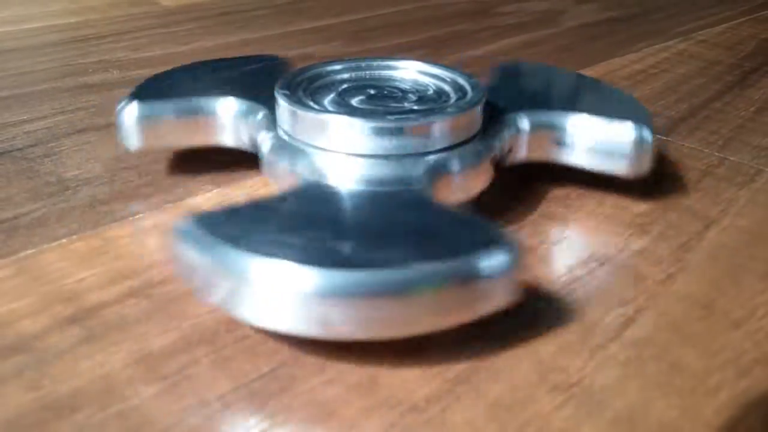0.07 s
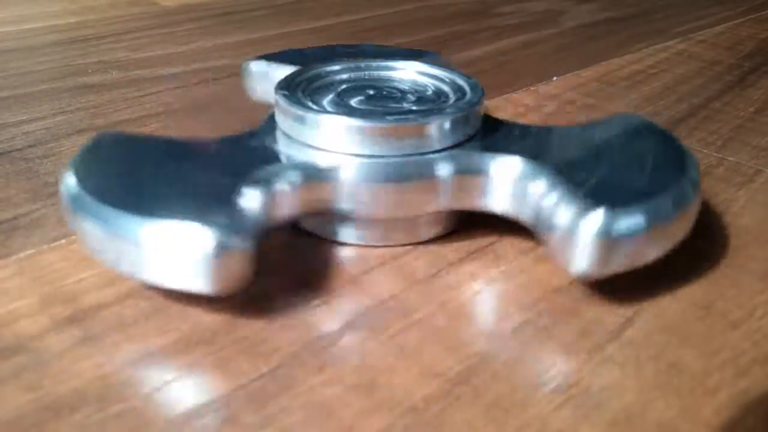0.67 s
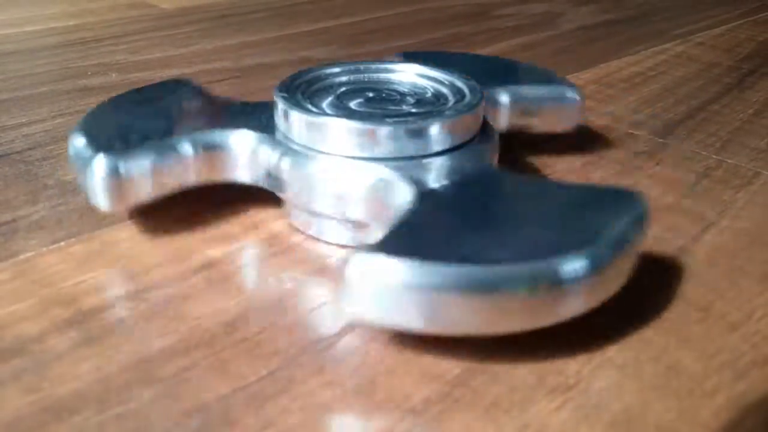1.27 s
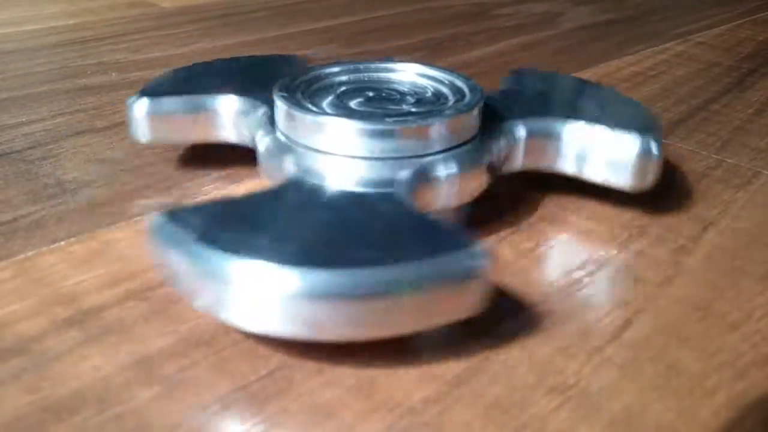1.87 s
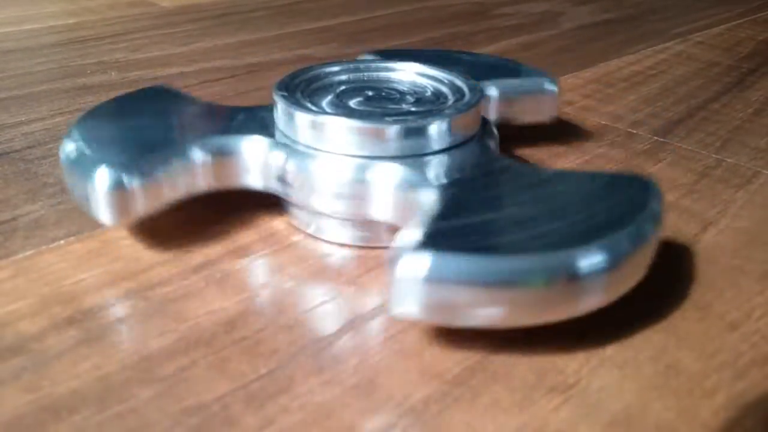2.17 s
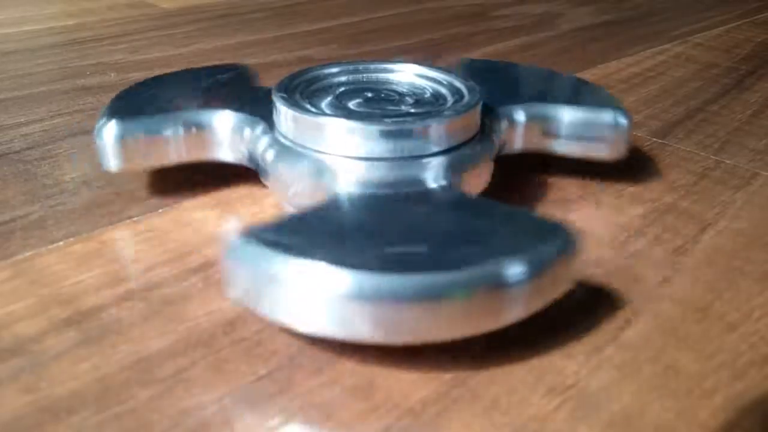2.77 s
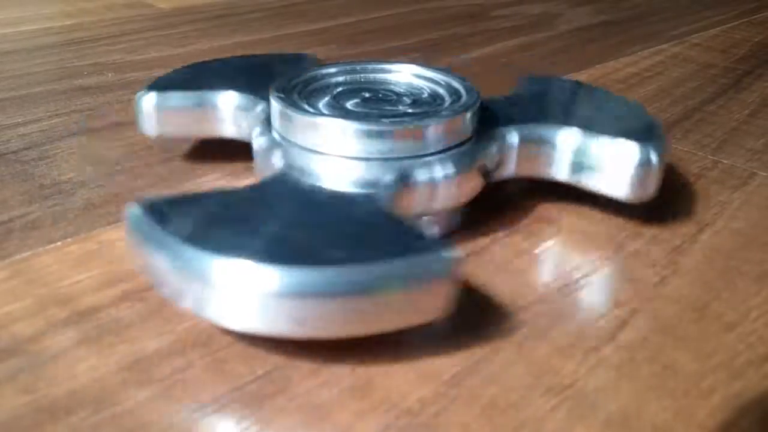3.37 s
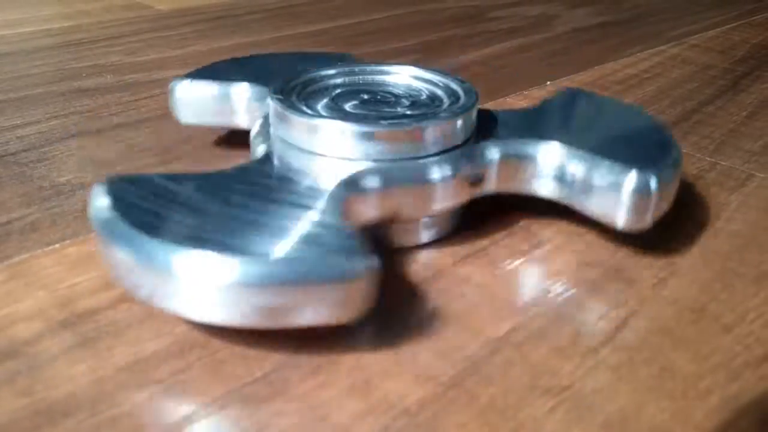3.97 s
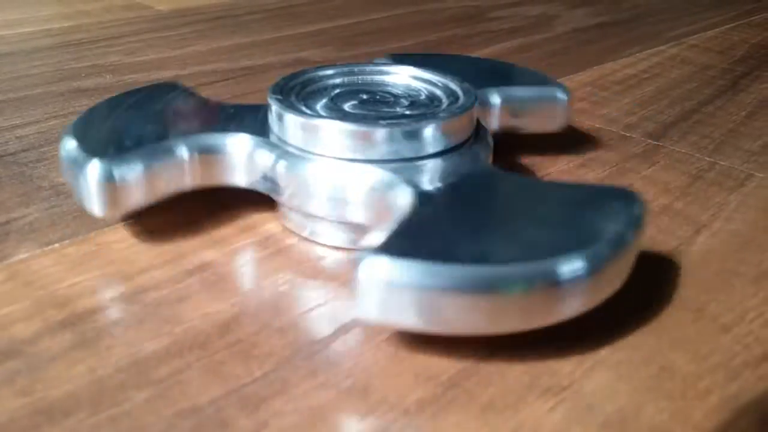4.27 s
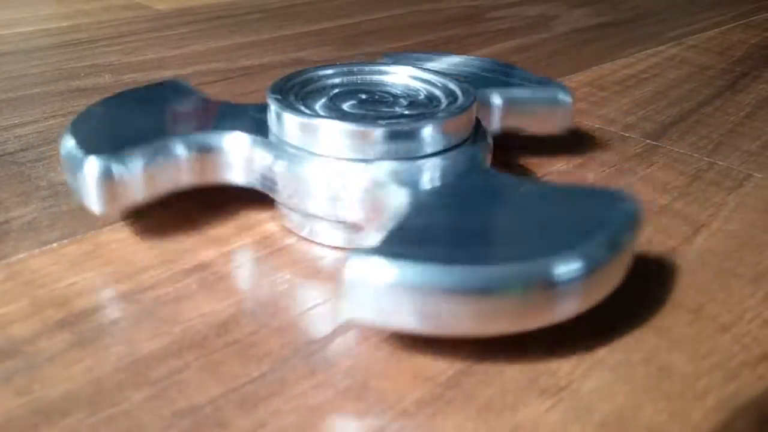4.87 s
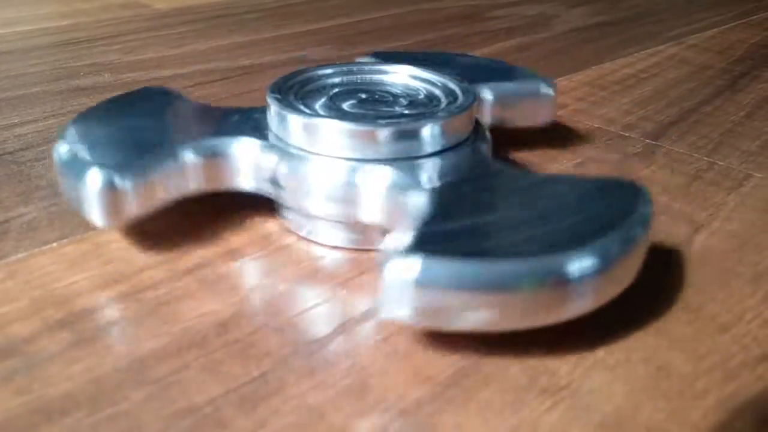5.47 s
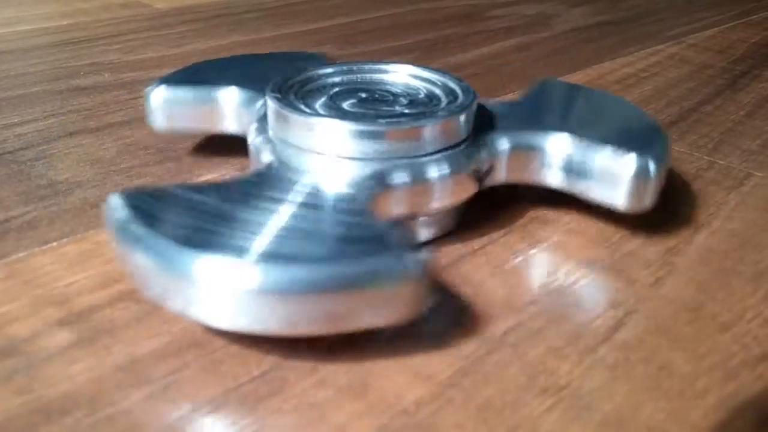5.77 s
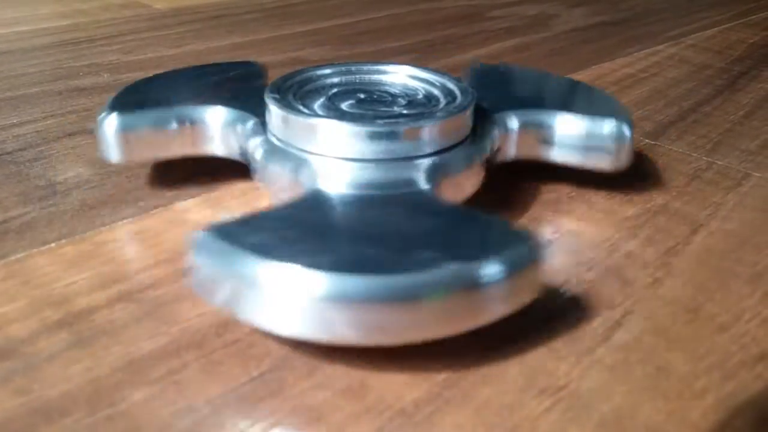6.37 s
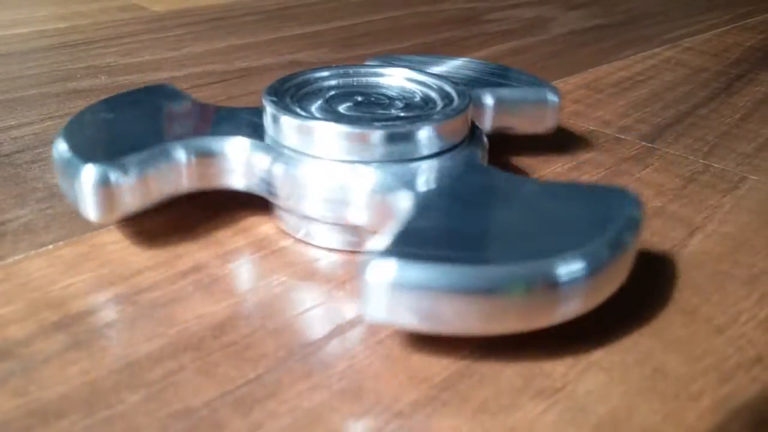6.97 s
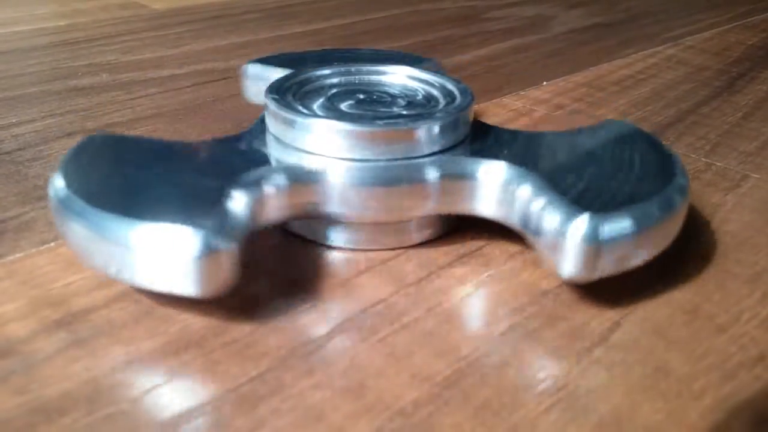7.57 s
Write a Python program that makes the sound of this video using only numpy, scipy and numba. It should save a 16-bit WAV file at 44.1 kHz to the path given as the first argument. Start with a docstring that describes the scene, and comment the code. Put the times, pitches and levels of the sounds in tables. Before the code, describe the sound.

In a quiet room, a low engine drone comes through the walls, swells after about a second, then sinks to a faint idle. An appliance hums under fluttering hiss, and a clock clacks softly about once a second. Light scuffs and a brief rustle come and go. Close to the microphone, a metal spinner on a wooden table gives a few tiny ringing ticks, and a dull bump sounds on the table near the end.

```python
"""An engine drones through the walls of a quiet room, swells, then idles; a faint hum swells with it.
An appliance motor hums over room air and microphone hiss; a faint rustle dies away.
Scuffs and brief low swells of noise come and go; a clock clacks in its case about once a second.
A metal spinner on a wooden table gives a few tiny ringing ticks; one bump rings the table top.
The phone's noise suppressor makes the hiss flutter up and down with the bass."""
import sys
import numpy as np
from scipy import signal
from scipy.fft import rfft, irfft, next_fast_len
from scipy.io import wavfile
from scipy.ndimage import uniform_filter1d
from numba import njit

SR = 44100
rng = np.random.default_rng(int(sys.argv[2]) if len(sys.argv) > 2 else 0)


def wav_record(signal):
    """Record a signal, one row per channel, as 16-bit PCM in the file named by sys.argv[1]."""
    frames = np.transpose(np.atleast_2d(signal))
    bounded = np.clip(frames, -1, 1)
    # unit amplitude maps onto the largest positive 16-bit level
    quanta = np.round(bounded * 32767).astype(np.int16)
    wavfile.write(sys.argv[1], SR, quanta)


N = 340893
TIME_S = np.arange(N) / SR


def undb(db):
    """Decibels to gain."""
    return 10 ** (np.asarray(db) / 20)


def curve(points):
    """(time_s, value) points joined by straight lines."""
    return np.interp(TIME_S, *np.transpose(points))


def walk(rate_hz):
    """Smooth random drift, spread 1, changing at about rate_hz."""
    hold = int(SR / rate_hz)
    steps = np.repeat(rng.standard_normal(N // hold + 1), hold)
    drift = uniform_filter1d(uniform_filter1d(steps, hold), hold)[:N]
    return drift / drift.std()


def noise(colour):
    """Noise shaped by (freq_hz, density_db) points."""
    freq_hz, density_db = np.transpose(colour)
    size = next_fast_len(N)
    bins_hz = np.maximum(np.fft.rfftfreq(size, 1 / SR), 1)
    gain = undb(np.interp(np.log(bins_hz), np.log(freq_hz), density_db)) * np.sqrt(SR / 2)
    return irfft(rfft(rng.standard_normal(size)) * gain, size)[:N]


def burst(start_s, rise_s, t60_s):
    """Envelope: linear rise to 1, exponential decay."""
    age_s = np.maximum(TIME_S - start_s, 0)
    decay = np.exp(-np.log(1000) * np.clip((age_s - rise_s) / t60_s, 0, 2))
    return np.minimum(age_s / rise_s, 1) * decay


def band_burst(start_s, level_db, centre_hz, width_hz, rise_s, t60_s):
    """A burst of noise in one broad resonance."""
    bins_hz = np.fft.rfftfreq(SR, 1 / SR)
    band = irfft(rfft(rng.standard_normal(SR)) / (1 + (2 * (bins_hz - centre_hz) / width_hz) ** 2))
    span = slice(int(start_s * SR), int(start_s * SR) + SR)
    envelope = burst(start_s, rise_s, t60_s)[span]
    shaped = band[:len(envelope)] * envelope
    out = np.zeros(N)
    out[span] = undb(level_db) * shaped * np.linalg.norm(envelope) / np.linalg.norm(shaped)
    return out


def strike(hits, modes, contact_s):
    """Blows ring damped modes; longer contact rounds the attack."""
    age_s = TIME_S[:SR // 4]
    ring = sum(undb(db) * np.sin(2 * np.pi * hz * age_s) * np.exp(-np.log(1000) * age_s / t60_s)
               for hz, db, t60_s in modes)
    ring *= np.minimum(age_s / contact_s, 1)
    out = np.zeros(N)
    for start_s, level_db in hits:
        place = out[int(start_s * SR):][:len(ring)]
        place += undb(level_db) * ring[:len(place)]
    return out


def drone_gain_db(dip_half_s=0.023):
    """The drone swells and sinks, with brief dips."""
    # loudness through the walls: time_s, gain_db
    loudness = [(0, -14.5), (.8, -13), (1.16, -11), (1.28, -5.5), (1.5, 1), (2.03, 3), (2.25, -3.5),
                (2.6, 0), (3.1, -3), (3.56, -4), (3.72, -13.5), (4.3, -14), (4.5, -16.5), (5.4, -13),
                (6.2, -15), (6.4, -22.5), (7.73, -19.5)]
    # level dips: time_s, depth_db
    dips = [(2.22, 3.5), (2.95, 5.5), (3.09, 3.5), (3.63, 3)]
    return curve(loudness) - sum(db * np.exp(-((TIME_S - at_s) / dip_half_s) ** 2) for at_s, db in dips)


def engine(gain_db, flutter_db=0.96, swell_db=0.5):
    """Low orders pass the walls, lifted as they slide through room modes."""
    # engine speed: time_s, cycle_hz
    speed = [(0, 42.5), (1.1, 43.3), (1.45, 45.0), (1.73, 45.0), (1.97, 41.8), (2.4, 40.7), (2.98, 40.35),
             (3.15, 39.9), (7.73, 39.8)]
    # engine orders: cycle_multiple, level_db
    orders = [(2, -51.5), (3, -52), (4, -57)]
    # room resonances: centre_hz, width_hz, lift_db
    room_modes = [(81.1, 1.8, 7), (90, 6, 13), (119.6, 2, 8.5), (124, 3, 3.5), (165, 7, 9.5), (179, 9, 5.5)]
    cycle_hz = curve(speed)
    phase = 2 * np.pi * np.cumsum(cycle_hz) / SR + 0.11 * walk(12)
    drone = 0
    for order, level_db in orders:
        lift_db = sum(db / (1 + (2 * (order * cycle_hz - centre_hz) / width_hz) ** 2)
                      for centre_hz, width_hz, db in room_modes)
        waver_db = flutter_db * walk(21.82) + swell_db * walk(4.17)
        tone = np.sin(order * phase + 2 * np.pi * rng.random())
        drone += undb(gain_db + level_db + lift_db + waver_db) * tone
    return np.sqrt(2) * drone


def faint_hum(gain_db, pitch_hz=297, flutter_db=3, wobble_rad=1.77):
    """A faint, wavering hum that swells with the drone."""
    level_db = gain_db - 64 + flutter_db * walk(20)
    return np.sqrt(2) * undb(level_db) * np.sin(2 * np.pi * pitch_hz * TIME_S + wobble_rad * walk(14))


def exhaust(gain_db, db_per_db=0.82):
    """Exhaust rumble follows the drone's level."""
    # rumble spectrum: freq_hz, density_db
    colour = [(30, -100), (60, -83.5), (90, -71), (200, -77), (330, -86), (600, -92), (1500, -102),
              (3000, -118)]
    return undb(db_per_db * gain_db - 0.5) * noise(colour)


def appliance(shaft_hz=59.25, waver_db=2.0, drift_rad=0.04):
    """A motor hums at multiples of its shaft rate."""
    # motor harmonics: shaft_multiple, level_db
    harmonics = [(1, -69.5), (2, -67.5), (3, -66.5), (4, -64), (5, -72.5), (6, -75), (7, -71), (9, -72.5),
                 (20, -79.5), (84, -94)]
    phase = 2 * np.pi * shaft_hz * TIME_S + drift_rad * walk(2)
    hum = sum(undb(db + waver_db * walk(5.5)) * np.sin(multiple * phase + 2 * np.pi * rng.random())
              for multiple, db in harmonics)
    return np.sqrt(2) * hum


def room(swell_db=1.08):
    """Dull, slightly swelling room air under steady microphone hiss."""
    # room air: freq_hz, density_db
    air_colour = [(20, -104), (42, -90.5), (65, -85), (90, -74.5), (135, -82.5), (205, -81), (310, -90),
                  (510, -89), (700, -95), (1150, -97.5), (1800, -104), (3000, -112), (6000, -125)]
    # microphone hiss: freq_hz, density_db
    hiss_colour = [(100, -109), (3000, -109), (6300, -108), (9500, -104.4), (13500, -103.9),
                   (16000, -104.4)]
    return noise(air_colour) * undb(swell_db * walk(3.2)) + noise(hiss_colour)


def rustle(gain_db=-2, uneven_db=1.6, end_s=1.66, fade_s=0.69):
    """Soft, uneven rubbing that fades out."""
    # rubbing spectrum: freq_hz, density_db
    colour = [(120, -100), (270, -80), (420, -92), (1100, -97.5), (2200, -104.5), (4500, -121)]
    fade = np.clip((end_s - TIME_S) / fade_s, 0, 1)
    return fade * undb(gain_db + uneven_db * walk(23)) * noise(colour)


def scuffs(width_ratio=0.46, t60_s=0.2):
    """Light knocks rise fast, scuffs slowly; higher ones are broader."""
    # knocks and scuffs: start_s, level_db, centre_hz, rise_s
    contacts = [(.026, -52, 477, 0.0095), (.515, -54.5, 530, 0.0026), (1.53, -67, 1400, .003),
                (2.816, -58.5, 1200, .02), (3.477, -55.5, 1050, 0.044), (3.484, -60.5, 1900, 0.023),
                (6.813, -56.5, 1040, .007)]
    return sum(band_burst(start_s, level_db, centre_hz, width_ratio * centre_hz, rise_s, t60_s)
               for start_s, level_db, centre_hz, rise_s in contacts)


def low_swells():
    """Brief low swells, all in one low band: mostly soft thuds, the last one the bump booming in the room;
    those at 3.8 and 4.322 s are only room noise."""
    # swells: start_s, level_db
    swells = [(0.031, -50), (.235, -51.5), (.40, -50), (.59, -47.5), (1.074, -50), (3.648, -45.5),
              (3.8, -46.5), (4.322, -54), (6.889, -49)]
    return sum(band_burst(start_s, level_db, centre_hz=150, width_hz=190, rise_s=0.0075, t60_s=0.11)
               for start_s, level_db in swells)


def clock(rise_s=0.0063, t60_s=0.056, room_db=-7, room_t60_s=0.47):
    """Each step of the hand clacks in the case and lingers in the room."""
    # hand steps: start_s, gain_db
    steps = [(.873, 0.5), (1.848, 2), (2.867, 4), (3.859, 2.5), (4.858, 2.5), (5.857, 1.5), (6.868, -9)]
    # case, heard across the room: freq_hz, density_db
    case_colour = [(500, -106), (900, -86.5), (1250, -89), (1500, -95.5), (2000, -96.5), (2900, -108),
                   (3450, -99), (3950, -108), (4400, -101), (4850, -105), (5250, -97.5), (6100, -112),
                   (9000, -125)]
    envelope = 0
    for start_s, gain_db in steps:
        direct = burst(start_s, rise_s, t60_s)
        tail = undb(room_db) * burst(start_s, 2 * rise_s, room_t60_s)
        envelope += undb(gain_db) * np.hypot(direct, tail)
    return envelope * noise(case_colour)


def spinner():
    """Tiny ticks ring the metal's high modes."""
    # ticks: start_s, level_db
    ticks = [(.937, -58), (4.775, -59), (6.6237, -41.5), (6.6304, -45)]
    # metal modes: pitch_hz, gain_db, t60_s
    metal_modes = [(4270, -8, 0.029), (4370, -4, 0.012), (4700, -5, 0.0077)]
    return strike(ticks, metal_modes, contact_s=0.00065)


def table_bump():
    """A dull blow rings the wooden top."""
    # bump: start_s, level_db
    bumps = [(6.8842, -34)]
    # table-top modes: pitch_hz, gain_db, t60_s
    wood_modes = [(125, -7.5, .07), (235, 4, .025), (340, -9, .024)]
    return -strike(bumps, wood_modes, contact_s=0.0026)


def scene():
    """All sources at one microphone near the table."""
    gain_db = drone_gain_db()
    background = engine(gain_db) + faint_hum(gain_db) + exhaust(gain_db) + appliance() + room()
    return (background + rustle() + scuffs() + low_swells() + clock() + spinner() + table_bump())[None]


@njit
def follow(x, up_s, down_s):
    """One-pole follower with separate rise and fall times."""
    out, state = np.empty(len(x)), x[0]
    for i in range(len(x)):
        state += (x[i] - state) / (1 + SR * (up_s if x[i] > state else down_s))
        out[i] = state
    return out


def suppress(x, threshold_db=-47.5, knee_db=3.0, depth_db=13.5, window_s=0.014):
    """Downward expander: turns quiet moments down; opens faster than it closes."""
    power = uniform_filter1d(x[0] ** 2, int(window_s * SR))
    level_db = 10 * np.log10(np.maximum(power, 1e-12))
    shut = 0.5 - 0.5 * np.tanh((level_db - threshold_db) / (2 * knee_db))
    return x * follow(undb(-depth_db * shut), up_s=0.001, down_s=0.0036)


def record(dry, low_cut_hz=45, high_cut_hz=15750):
    """The phone suppresses quiet noise, then cuts deep bass and top treble."""
    low_cut = signal.butter(2, low_cut_hz, "highpass", fs=SR, output="sos")
    high_cut = signal.ellip(12, 0.1, 70, high_cut_hz, fs=SR, output="sos")
    return signal.sosfilt(high_cut, signal.sosfilt(low_cut, suppress(dry)))


dry = scene()
out = record(dry)
wav_record(out)
```